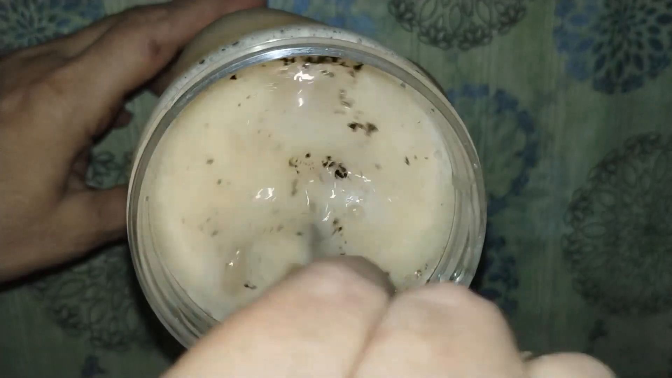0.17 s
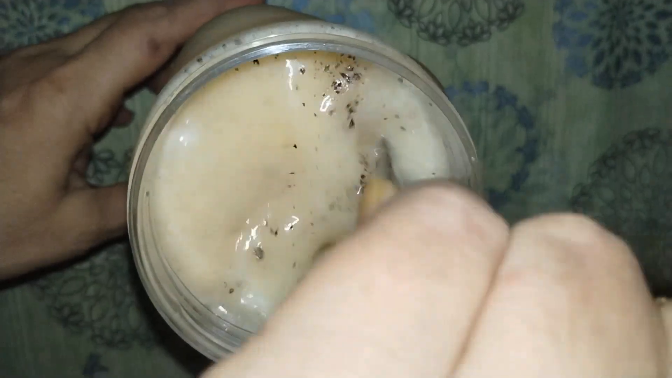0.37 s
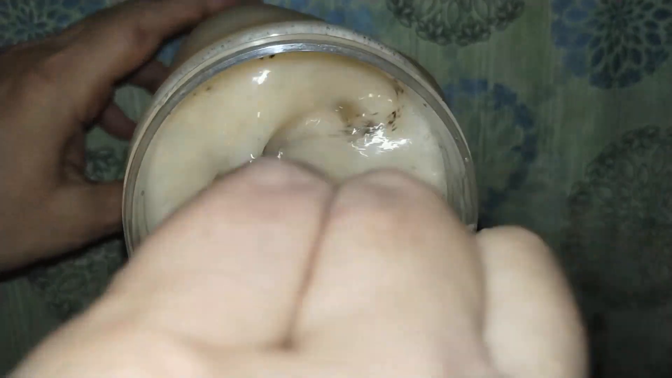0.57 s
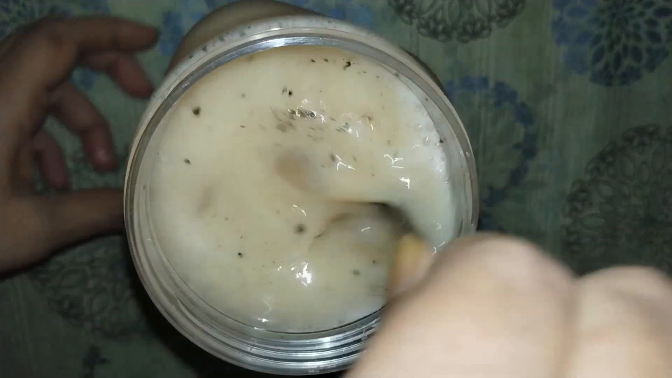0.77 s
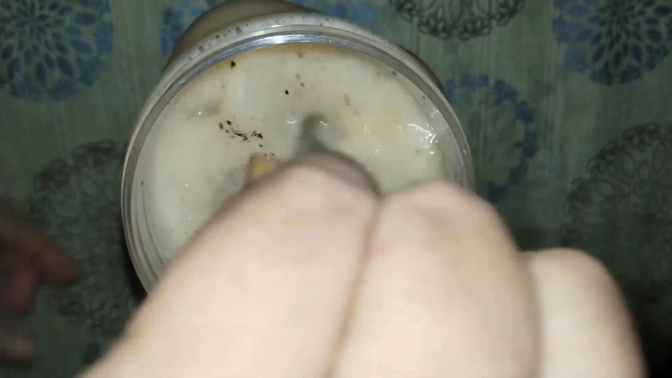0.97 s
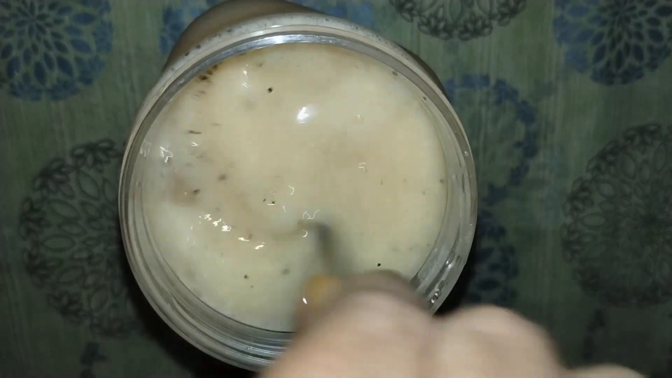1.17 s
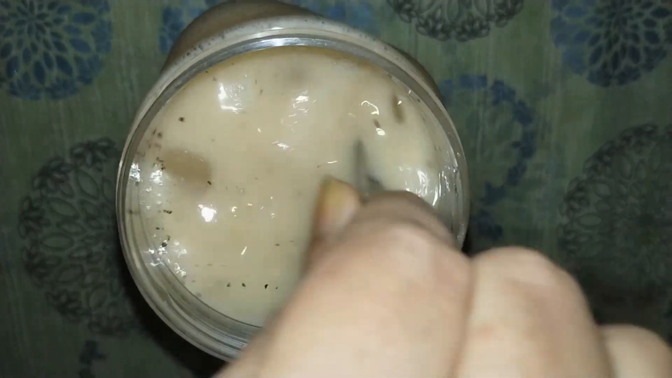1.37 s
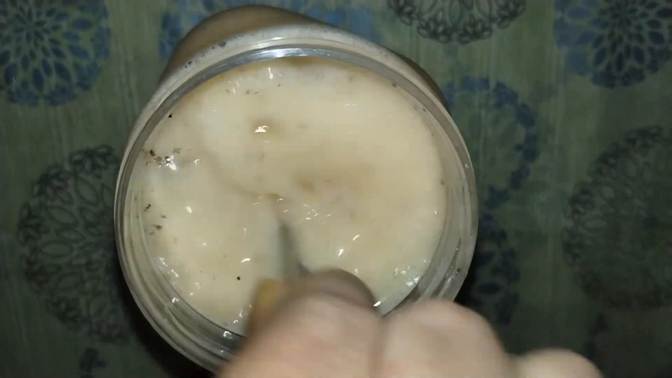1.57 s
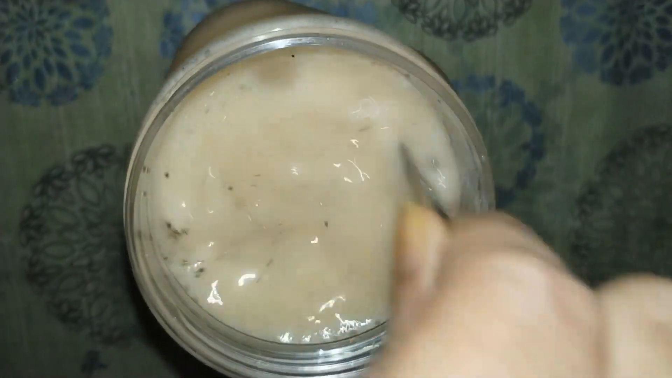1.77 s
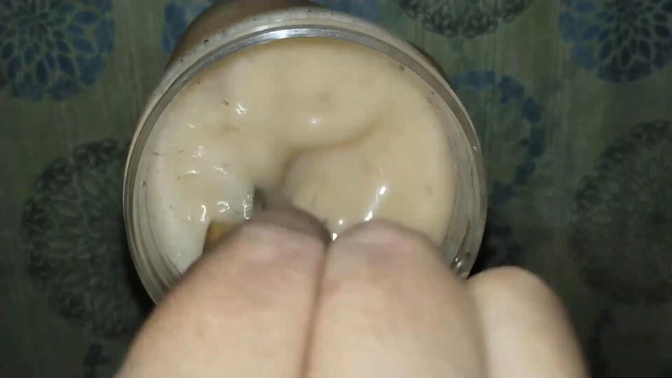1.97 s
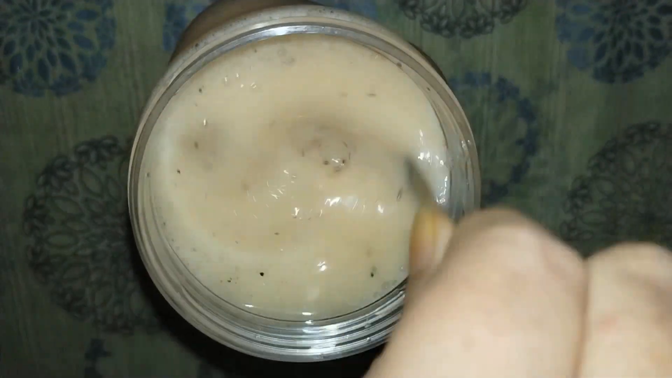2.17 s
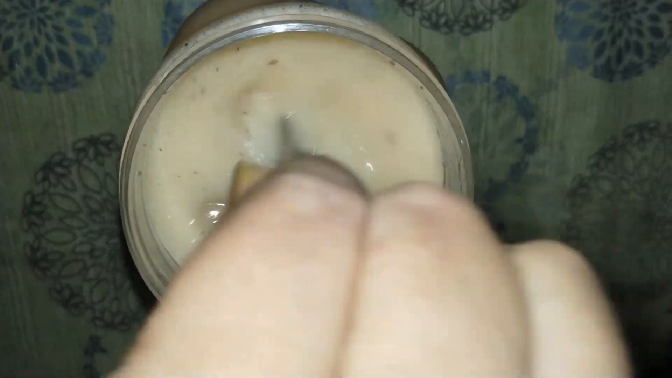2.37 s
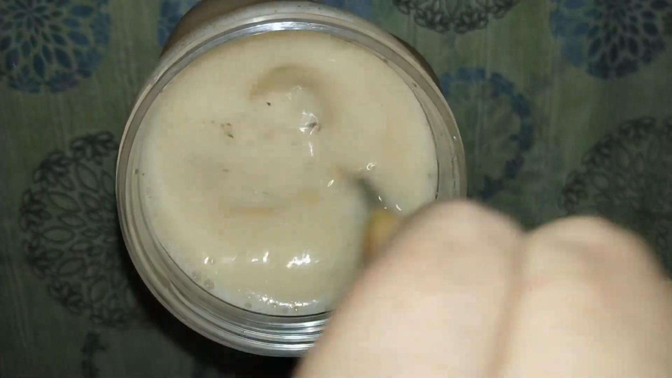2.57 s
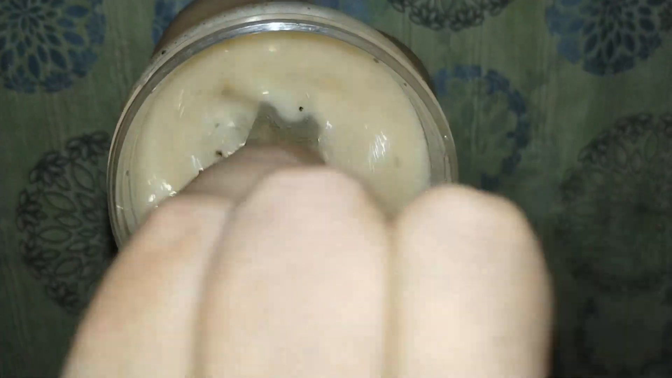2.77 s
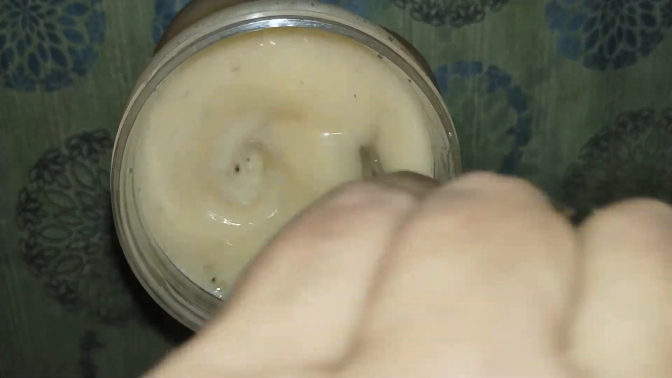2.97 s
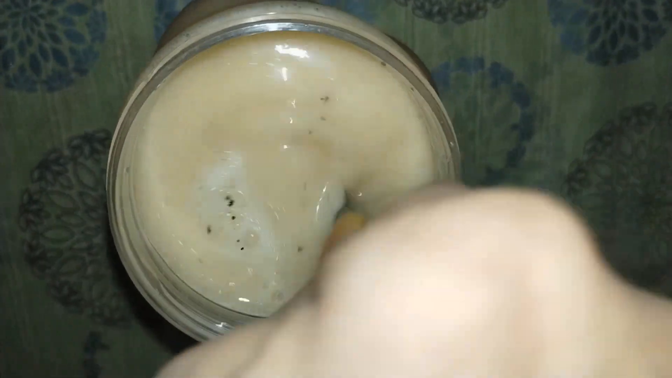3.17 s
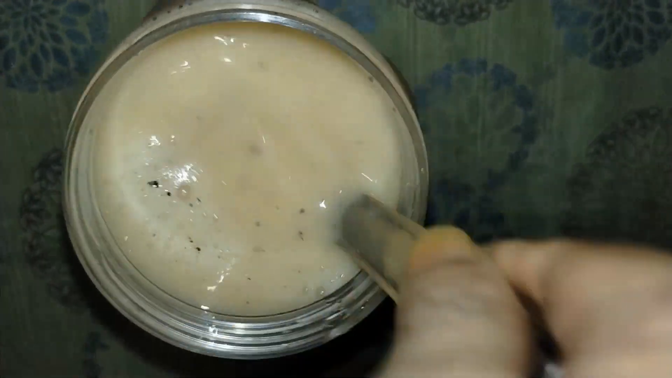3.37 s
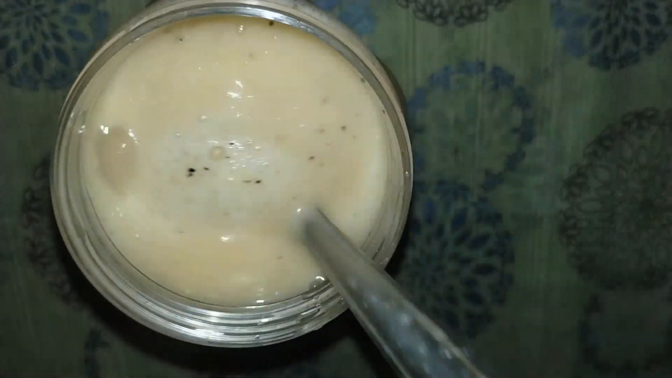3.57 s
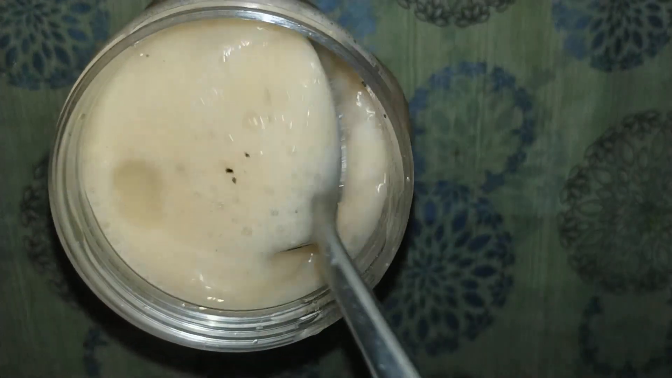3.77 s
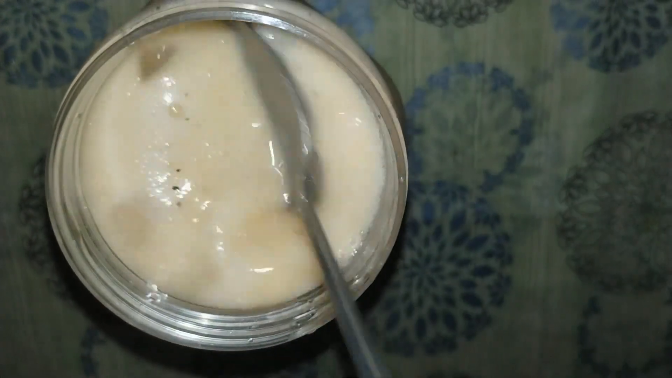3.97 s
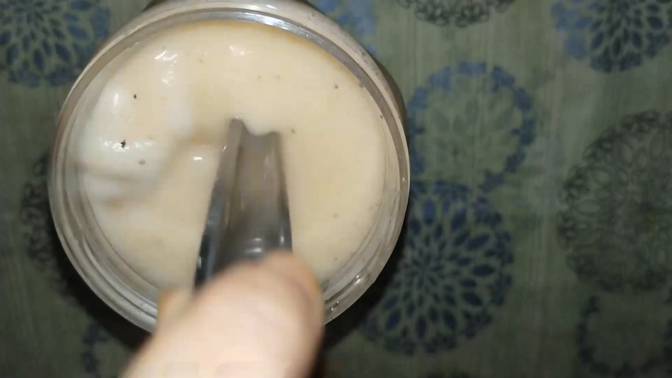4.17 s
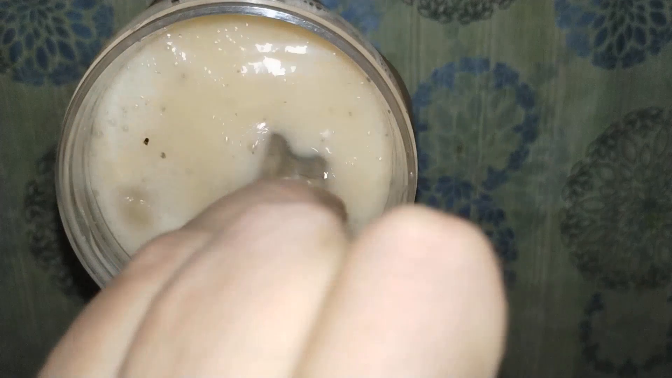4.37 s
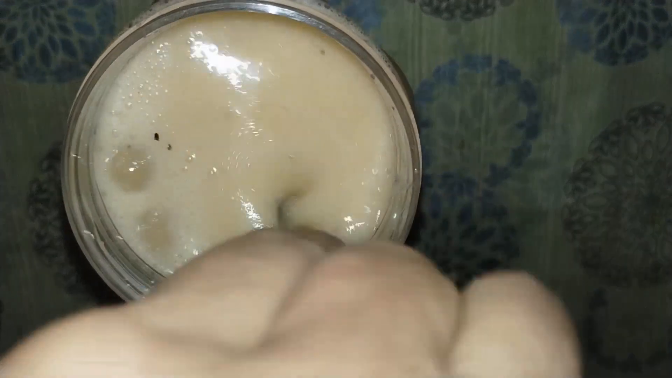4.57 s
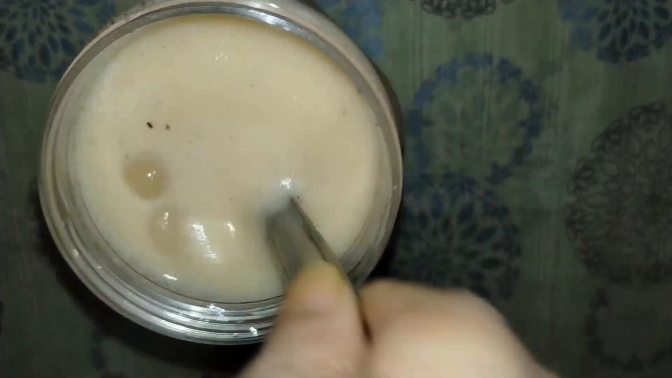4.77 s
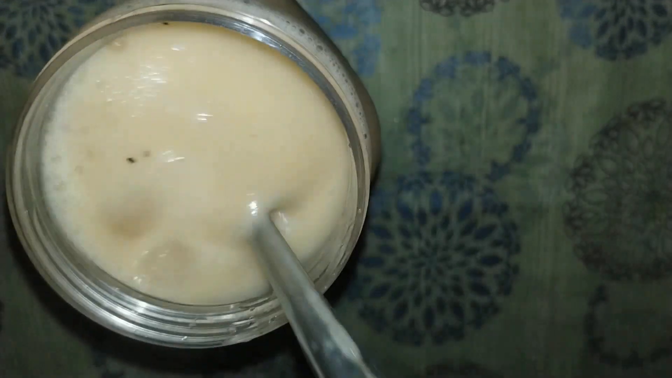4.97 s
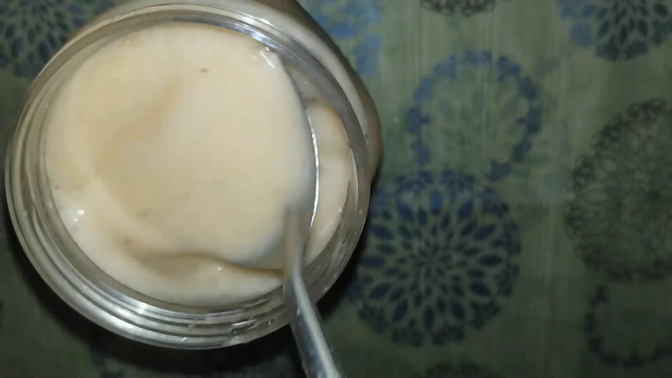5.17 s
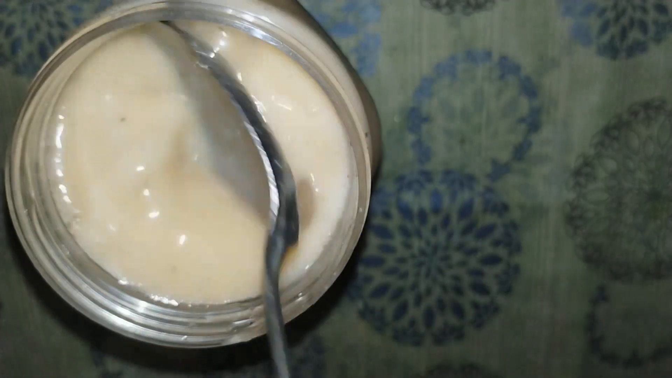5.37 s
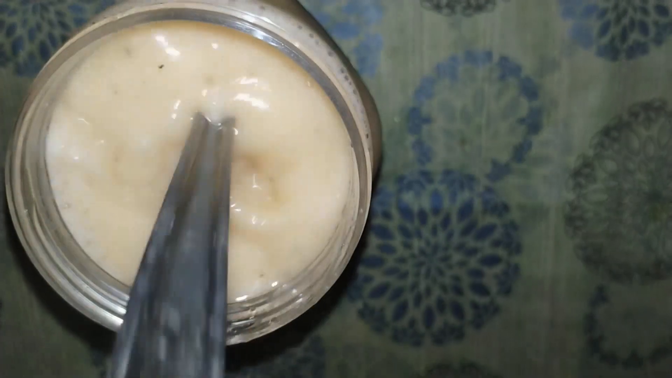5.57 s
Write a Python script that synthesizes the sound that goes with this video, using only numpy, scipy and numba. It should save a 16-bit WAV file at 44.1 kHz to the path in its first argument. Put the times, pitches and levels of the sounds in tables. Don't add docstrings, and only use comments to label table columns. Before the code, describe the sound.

A metal spoon stirs thick creamy drink in a glass jar, recorded very close in a small hard kitchen. Damped knocks and ice ticks come fast and uneven, with short scrapes and low table booms. Stirring eases after three seconds, knocks hard again around four and a half, then ends in light ticks. A fridge hums quietly throughout.

```python
import sys
import numpy as np
from scipy import signal
from scipy.fft import rfft, irfft
from scipy.io import wavfile
from scipy.ndimage import uniform_filter1d
from numba import njit

SR = 44100
rng = np.random.default_rng(int(sys.argv[2]) if len(sys.argv) > 2 else 0)


def voltage_ratio(decibels):
    exponent = np.asarray(decibels, float) / 20
    return 10 ** exponent


def output_pcm(signal):
    pcm = np.clip(np.atleast_2d(signal).T, -1, 1) * 32767
    wavfile.write(sys.argv[1], SR, np.round(pcm).astype(np.int16))


N = 247665

# start_s, level_db
FRIDGE_LEVEL = [
    (0.0, -43.5),
    (2.17, -42.5),
    (2.6, -42.5),
    (3.55, -47),
    (4.65, -48),
    (4.85, -45.5),
    (5.47, -50),
    (5.62, -46),
]
# peak_s, level_db, fade_ms_per_10db
SHUDDERS = [
    (0.02, -47, 911),
    (1.4, -45, 614),
    (2.601, -57, 402),
    (3.699, -51, 302),
    (4.82, -35.5, 163.5),
]
# freq_hz, density_db_per_hz
KITCHEN_SPECTRUM = [(20, -52.5), (37, -22), (130, 17.5), (172, -8.5), (399, -16), (1710, -53), (6720, -27),
                    (16000, -37.5)]
# peak_s, level_db, pitch_hz, fade_ms_per_10db
BOOMS = [(0.265, -32, 128, 140.5), (0.599, -33.5, 127.1, 203.5), (0.7, -29, 128.6, 45),
         (0.829, -32.5, 131, 56.5), (1.263, -30, 130.1, 50), (1.38, -38.5, 130.5, 196.5),
         (1.541, -32.5, 128.7, 19), (1.725, -28.5, 135.4, 64.5), (1.91, -40.5, 129.2, 209),
         (2.186, -25.5, 130, 46), (2.429, -38, 136.3, 50.5), (2.636, -26.5, 134.4, 77.5),
         (2.86, -47, 130.2, 145), (3.12, -36, 130.8, 68.5), (3.55, -42.5, 125.5, 299),
         (4.22, -44.5, 133.8, 61.5), (4.35, -45, 127.4, 149.5), (4.53, -35, 133.3, 31.5),
         (4.64, -38.5, 128.3, 146), (5.28, -41.5, 126.9, 245)]
# time_s, level_db
EFFORT = [(0, -45), (0.12, -52.5), (0.44, -46.5), (0.62, -45), (0.83, -49.5), (1.2, -45), (1.5, -49.5),
          (1.8, -44), (2.2, -52), (2.39, -49.5), (2.55, -50), (3.15, -46), (3.3, -49.5), (4.02, -62),
          (4.36, -44.5), (4.71, -50), (4.85, -58.5), (5.62, -58.5)]

# freq_hz, level_db, t60_s
WALL_MODES = [(566, -33, 0.4), (572, -5.5, 0.2), (665, -5.5, 0.18), (736, -41, 0.32), (744, -23, 0.51),
              (828.2, -3, 0.17), (870, -5.5, 0.068), (975, -5.5, 0.045)]
# freq_hz, level_db, t60_s
RIM_MODES = [(1150, 5, 0.019), (1250, -6, 0.051), (1444, 3, 0.023), (1661, 5, 0.043), (1905, -5, 0.054),
             (2033, -1, 0.084), (2234, -1, 0.075), (2560, -1.5, 0.024), (2740, -19, 0.11),
             (3000, -48, .025), (3440, -31.5, 0.0043), (3620, 1, 0.0089), (4000, -41, 0.03),
             (5410, -9, 0.0188)]
JAR_MODES = WALL_MODES + RIM_MODES
# freq_hz, level_db, t60_s
THUD_MODES = [(201.4, -40.5, 0.18), (261, -28, 0.073), (169.9, -29.5, 0.22), (350, -37, 0.15)]
# freq_hz, density_db_per_hz
CRACK_SPECTRUM = [(880, -31.5), (1500, 14.5), (2440, -9), (3350, -9.5), (5070, -20.5), (6500, -21),
                  (11000, -25.5), (16000, -34.5)]
# freq_hz, density_db_per_hz
RASP_SPECTRUM = [(88, -18), (150, -3), (398, -17.5), (555, -15), (837, -14), (1690, -16.5), (8730, -34),
                 (16000, -46.5)]
# freq_hz, left_minus_right_db
LEFT_GAIN = [(200, -1.5), (400, -4.5), (700, 7.5), (1300, -0.5), (2400, 2), (4400, -4), (8000, 8.5),
             (15000, 6.5)]

# start_s, peak_db, upper_mode_hz, upper_db, crack_db
FOOT_KNOCKS = [(0.091, -16, 1250, -39, -56), (0.156, -14.5, 1500, -8.5, -21), (0.484, -15.5, 1370, -8, -19),
               (1.231, -10, 2190, 5.5, -9), (1.43, -22, 3040, 16.5, -8.5), (1.489, -17.5, 1150, -4, -17.5),
               (1.927, -8.5, 1550, -38, -23), (2.289, -16.5, 1648, -7, -23), (2.603, -2.5, 1196, -9, -35),
               (2.995, -12, 1190, -6, -16), (3.019, -19, 1228, -8, -13), (3.938, -19, 1596, -4.5, -18),
               (4.601, -12, 1675, -3.5, -20)]
# start_s, peak_db, upper_mode_hz, upper_db, crack_db
LOW_KNOCKS = [
    (2.541, -10.5, 1720, 5, -26),
    (4.205, -10.5, 1870, 2.5, -12.5),
    (4.509, -4, 1306, -4.5, -13),
]
# start_s, peak_db, upper_mode_hz, upper_db, crack_db
BELLY_KNOCKS = [
    (0.723, -12.5, 1720, -4.5, -22),
    (1.032, 1.5, 1540, -4, -31.5),
    (1.171, -14.5, 1660, -3, -16),
    (1.608, -19, 1870, -16, -11),
    (2.072, -15, 1582, 1.5, -14.5),
    (4.359, -16.5, 1730, 3, -20.5),
    (4.664, -28, 1723, 2.5, -28.5),
    (5.599, -17, 2286, -7.5, -32),
]
# start_s, peak_db, upper_mode_hz, upper_db, crack_db
SHOULDER_KNOCKS = [(0.237, -18, 1560, 10, -10.5), (0.312, -5, 1110, -8, -24.5),
                   (0.563, -7.5, 1040, -3, -27), (0.648, -14.5, 1840, -16, -23),
                   (0.79, -8.5, 1500, -2.5, -19), (0.829, -11, 1080, -7, -32),
                   (1.309, -16.5, 1060, 6.5, -16.5), (1.68, -13.5, 2730, -6, -24),
                   (1.693, -7, 1444, -11, -18), (1.758, -7, 1315, -23, -12), (2.155, -9.5, 1870, -11, -15),
                   (2.334, -20, 1150, 3, -8), (2.387, -10, 1270, -2.5, -15), (2.668, -11, 1040, 3.5, -16),
                   (2.801, -9.5, 1660, -7, -23), (3.05, -17.5, 1000, 12.5, -13),
                   (3.09, -7, 1470, -4.5, -8.5), (3.127, -13.5, 1180, 1, -14.5),
                   (3.415, -13, 1033, -34, -47), (3.749, -20, 1975, 1.5, -11),
                   (4.165, -13, 3365, 11, -13.5), (5.556, -14.5, 1710, 3, -14)]
# start_s, peak_db, upper_mode_hz, upper_db, crack_db
ICE_TICKS = [(0.463, -40, 1150, 18, 0), (0.5, -25, 1790, -26, 2.5), (0.952, -24.5, 1640, -3, -7),
             (0.983, -19.5, 1780, 3, -20), (0.878, -34.5, 3000, 8, 2), (1.407, -33, 1240, 4, -14),
             (1.843, -27, 4200, 11.5, -11), (1.871, -35, 1226, -7, 1), (2.276, -71, 1619, -10, -17),
             (2.967, -35, 1202, -22, -5), (2.981, -17, 1530, -1, -20), (3.198, -26.5, 1452, 3, -10.5),
             (3.312, -29, 1335, 0.5, -2.5), (3.372, -30, 1970, 9.5, -17), (3.392, -27, 1620, 3, -24),
             (3.732, -56, 1464, 10, 6), (3.964, -23.5, 1192, -20, -45), (4.326, -19.5, 1670, -5, -54),
             (4.422, -20.5, 1220, 10.5, -6), (5.049, -38, 1520, 13.5, -45), (5.097, -19, 1520, 5, -17),
             (5.12, -29, 1630, 13, -17), (5.389, -14, 2360, 1.5, -7), (5.512, -49, 2560, -10, 15)]
# time_s, treble_db
HARDNESS = [(0.237, -2), (0.312, -33), (0.47, 6), (0.5, 6), (0.563, -5), (0.648, -15), (0.79, 0),
            (0.829, -7.5), (0.96, -1), (1.032, 5), (1.171, -1), (1.309, -5), (1.43, 0.5), (1.608, 6),
            (1.693, 9.5), (1.758, -12), (1.843, 4), (1.88, 7), (1.93, 9.5), (2.072, 6), (2.289, -1),
            (2.39, -8), (2.541, 3.5), (2.8, -2), (2.97, 3), (3.0, 1.5), (3.09, -1.5), (3.31, 6), (3.42, 5),
            (3.938, -1.5), (4.165, 7), (4.205, -7), (4.359, -13), (4.422, -8), (4.509, -5), (4.664, -4),
            (5.097, 3), (5.12, -3), (5.389, -4), (5.512, 1.5), (5.556, -5)]
# start_s, level_db, centre_hz, length_ms
SKIDS = [(0.146, -55, 8150, 22), (0.25, -45, 14000, 9.3), (0.488, -32, 8500, 21), (0.499, -30.5, 6500, 14),
         (0.829, -39, 12900, 3.9), (0.877, -34.5, 7850, 3.6), (0.968, -55, 9000, 8),
         (1.014, -29, 10400, 22), (1.165, -38, 6400, 16), (1.23, -32, 7900, 10), (1.406, -38, 6550, 5.8),
         (1.428, -19, 3080, 9.1), (1.428, -27.5, 3740, 8.7), (1.427, -29, 6100, 9.2),
         (1.604, -34, 7460, 3.5), (1.677, -37, 10500, 8), (1.829, -36, 6000, 29), (1.87, -25, 11800, 6),
         (1.871, -21, 8170, 3.4), (1.926, -34, 8600, 20), (2.139, -50, 9700, 14), (2.157, -30, 6200, 8.9),
         (2.32, -38, 9850, 37), (2.385, -45, 9790, 33), (2.539, -31, 5600, 6.1), (2.666, -40, 8100, 8.5),
         (2.9, -45, 3410, 4.6), (2.963, -41, 8800, 10.2), (3.033, -32, 4970, 3.7), (3.09, -29, 8850, 17.3),
         (3.7, -42, 1647, 13), (3.749, -27.5, 6640, 4.1), (3.938, -24, 5790, 2.9), (3.939, -35, 7560, 8),
         (4, -48, 4000, 6.8), (4.164, -23.5, 10300, 4.4), (4.18, -32, 6900, 19), (4.203, -21.5, 2830, 7),
         (4.285, -52, 8140, 10), (4.386, -44, 3000, 5.1), (4.45, -36, 2304, 5.4), (4.509, -9, 3470, 2.9),
         (4.509, -21, 9100, 9.1), (5.008, -56, 2545, 20), (5.149, -50, 2580, 8.8), (5.281, -53.5, 7400, 27),
         (5.388, -34, 3695, 7.6), (5.389, -32.5, 5620, 12), (5.41, -35, 1520, 13), (5.512, -34, 9500, 3.5),
         (0.26, -46, 2000, 8), (0.63, -49, 3000, 5.1), (1.035, -36, 1510, 14), (1.05, -28, 2500, 12),
         (1.065, -38, 2200, 8), (1.45, -34, 1290, 8.9), (1.635, -48, 1800, 8), (1.759, -26.5, 1100, 11),
         (1.762, -37, 1800, 6.9), (1.888, -38, 1490, 10), (1.945, -37, 1590, 16), (2.005, -41, 1500, 5.5),
         (2.215, -35.5, 1100, 5.4), (2.335, -44, 1150, 9), (2.35, -27, 1920, 6.7), (2.418, -32, 920, 8.3),
         (2.668, -28, 1880, 11), (2.94, -34, 2346, 10.2), (3.13, -37.5, 2180, 20), (3.425, -38, 3580, 4.9),
         (4.165, -24, 900, 6.8), (4.205, -29, 1846, 11), (4.385, -36, 1665, 7.2), (4.422, -34.5, 1150, 9.3),
         (4.665, -27, 1647, 8.9), (5.115, -39, 1125, 16), (5.565, -33, 2520, 4.4), (5.59, -38, 1488, 8.8)]
# start_s, peak_db, pitch_hz
BUMPS = [(0.2, -39.5, 322), (0.243, -33, 228), (1.444, -29, 210), (1.757, -30, 366), (2.068, -34.5, 320),
         (2.601, -30, 242), (2.8, -33, 252), (2.993, -28.5, 243), (3.086, -35, 234), (4.326, -42, 325),
         (4.518, -28.5, 240), (4.615, -31, 225), (1.036, -22, 540), (2.543, -17.5, 665), (2.606, -33, 570),
         (3.052, -30, 830), (4.216, -25, 657), (4.522, -16, 658)]
# peak_s, peak_db, fall_ms, dullness_db
STROKES = [(0.251, -35.5, 23, 2), (0.5, -33.5, 50, -2), (0.831, -14, 4.5, -7), (0.971, -33.5, 41, -6.5),
           (1.036, -31.5, 35, 5), (1.236, -30.5, 20, -17), (1.431, -24, 22, -10.5),
           (1.621, -36.5, 42, -6.5), (1.698, -30, 9.6, 3), (1.762, -25.5, 13.5, -0.5),
           (1.881, -32.5, 20, 1.5), (1.929, -25.5, 20.3, -4), (2.078, -26.5, 15, -19),
           (2.162, -30.5, 31.6, -6), (2.34, -34.5, 39.4, 3.5), (2.393, -30.5, 29.5, -17),
           (2.544, -38.5, 15.4, 8), (2.621, -26.5, 8.2, -4), (2.673, -31, 25.7, -8), (2.801, -36.5, 18, -1),
           (2.992, -21, 19.6, -11), (3.095, -16, 18, -11.5), (3.324, -45, 72, -5), (3.427, -37.5, 27, -9),
           (3.756, -57.5, 31, 14), (3.951, -39, 20, 3), (4.174, -23, 10.7, -15), (4.427, -46, 23, 6.5),
           (4.509, -13.5, 6.8, -4.5), (4.664, -31.5, 21, -7)]

FOOT_HZ, LOW_HZ, BELLY_HZ, SHOULDER_HZ, ICE_HZ = 542, 680, 665, 870, 846
WALL_TOP_HZ, HARD_SPLIT_HZ = 1000, 6600
PUSH_DELAY = 40
PORT_SIGNS = np.array([[1], [-1]])


def level(x, db):
    return x * voltage_ratio(db) / np.sqrt(np.mean(x ** 2))


def along(table, hz):
    table_hz, value = np.transpose(table)
    return np.interp(np.log(hz + 1), np.log(table_hz), value)


def curve(table):
    time_s, value = np.transpose(table)
    return np.interp(np.arange(N) / SR, time_s, value)


def colour(x, table, lo_hz=1, hi_hz=22000):
    hz = np.fft.rfftfreq(x.shape[-1], 1 / SR) + 1
    edges = 1 / np.sqrt((1 + (lo_hz / hz) ** 8) * (1 + (hz / hi_hz) ** 8))
    return irfft(rfft(x) * voltage_ratio(along(table, hz)) * edges, x.shape[-1])


def walk(rate_hz):
    hold = int(SR / rate_hz)
    steps = np.repeat(rng.standard_normal(N // hold + 1), hold)
    return 1.3 * uniform_filter1d(uniform_filter1d(steps, hold), hold)[:N]


def fine(coarse):
    return np.repeat(coarse, 32)[:N]


def swells(peak_s, db, fade_ms, rise_ms):
    late_ms = 1000 * (np.arange(0, N, 32) / SR - peak_s[:, None])
    pace_ms = np.where(late_ms < 0, rise_ms, np.maximum(fade_ms[:, None], 10))
    return voltage_ratio(db[:, None] - 10 * np.abs(late_ms) / pace_ms)


def tone(hz):
    return np.sin(2 * np.pi * np.cumsum(hz) / SR)


def train(where, rows):
    return np.bincount(where, rows.ravel(), minlength=N)[:N]


def grit(rate_hz, spread_db):
    hits = rng.random(N) < rate_hz / SR
    size_db = np.minimum(spread_db * rng.exponential(size=N), 14)
    return hits * voltage_ratio(size_db) * rng.standard_normal(N)


@njit
def ring(push, hz, t60):
    out, z = np.empty(len(push)), 0j
    fade = np.exp(-np.log(1000) / (t60 * SR))
    for i in range(len(push)):
        angle = 2 * np.pi * hz[i] / SR
        z = z * fade * complex(np.cos(angle), np.sin(angle)) + push[i]
        out[i] = z.imag
    return out


def fridge():
    hum_db = curve(FRIDGE_LEVEL)
    hum = tone(97.5 * (1 + 0.00727 * walk(5.96))) * voltage_ratio(hum_db + 0.5)
    shudder = fine(np.sum(swells(*np.transpose(SHUDDERS), 160), axis=0)) + voltage_ratio(hum_db - 12.5)
    undertone = tone(72.5 * (1 + 0.025 * walk(5.56))) * shudder * voltage_ratio(-7.0 + 1.4 * walk(7.24))
    return hum + undertone


def kitchen():
    mid, side = rng.standard_normal((2, N))
    side = colour(side, [(30, 17), (100, -31.5), (300, -30.0), (2000, -67)])
    air = colour(mid + side * PORT_SIGNS, KITCHEN_SPECTRUM)
    treble = colour(air, [(20, 0.0042), (20000, 0.0037)], 203)
    return air * voltage_ratio(-62.5 + 0.39 * walk(2.9)) / np.sqrt(np.mean(treble ** 2))


def table():
    peak_s, db, pitch_hz, fade_ms = np.transpose(BOOMS)
    each = swells(peak_s, db, fade_ms, 25.6) + 1e-12
    hz = fine(pitch_hz @ each / np.sum(each, axis=0))
    size = fine(np.max(each, axis=0)) + voltage_ratio(curve(EFFORT) - 4.5)
    boom = tone(hz * (1 + .025 * walk(14))) * size * voltage_ratio(3 + 1.0 * walk(30))
    drone_s, drone_fade_ms = 1.3, 380
    late_ms = 1000 * (np.arange(N) / SR - drone_s)
    drone_db = -47 - 10 * (late_ms / drone_fade_ms) ** 2
    boom += tone(178 * (1 + .04 * walk(6))) * voltage_ratio(drone_db + 5 * walk(12))
    return boom * voltage_ratio(.5 * PORT_SIGNS)


def slosh(rasp_db, hiss_db):
    grains = level(grit(1500, 3.5), 0)
    gaps_db = 2.8 * walk(22)
    rasp = colour(0.85 * grains + rng.standard_normal((2, N)), RASP_SPECTRUM, 100, 3440)
    hiss = colour(grains + 2.3 * rng.standard_normal((2, N)), RASP_SPECTRUM, 6030)
    return level(rasp, 0) * voltage_ratio(rasp_db + gaps_db), level(hiss, -0.7) * voltage_ratio(hiss_db + 2.2 * gaps_db)


def knocks():
    groups = ((FOOT_KNOCKS, FOOT_HZ), (LOW_KNOCKS, LOW_HZ), (BELLY_KNOCKS, BELLY_HZ),
              (SHOULDER_KNOCKS, SHOULDER_HZ), (ICE_TICKS, ICE_HZ))
    return np.transpose(sorted(row + (hz,) for rows, hz in groups for row in rows))


def chatter(age_s, count):
    luck = rng.random((count, 3, len(age_s)))
    fade_s = (0.0072 * voltage_ratio(0.45 * (luck[:, 2, 0] + 1.0)))[:, None]
    contacts = ((luck[:, 0] < .07) * 1.3 + 0.092) * (luck[:, 1] - .5) * np.exp(-age_s / fade_s)
    contacts[:, PUSH_DELAY] = 1.5
    contacts[:, :PUSH_DELAY] = 0
    return contacts / np.sqrt(np.sum(contacts ** 2, axis=1, keepdims=True))


def cushion_push(contacts, corner_hz):
    axis_hz = np.fft.rfftfreq(contacts.shape[1], 1 / SR)
    return irfft(rfft(contacts) / (1 + (axis_hz / corner_hz) ** 4))


def glass(events, where, age_s, soft, firm, rasp_db, dull):
    _, peak_db, upper_hz, upper_db, _, wall_hz = events
    place = rng.standard_normal((len(peak_db), len(JAR_MODES) + 1, 2))
    drag = level(grit(2000, 2.5), 0) * voltage_ratio(3 * walk(60))
    flutter = voltage_ratio(2.5 * walk(35))
    sway = 1 + 0.007 * walk(14)
    shiver = np.resize(flutter[::6], N) ** 2
    out = np.zeros((2, N))
    for k, (hz, db, t60) in enumerate(JAR_MODES):
        if hz < WALL_TOP_HZ:
            size_db = -13 - np.minimum(25 * np.abs(np.log2(hz / wall_hz)), 8)
            rub = voltage_ratio(db + rasp_db - 35) + voltage_ratio(db - 38.5) * dull
            push, t60_top, brush = soft, 1, flutter
        else:
            size_db = upper_db - 15.5 - np.minimum(9 * np.abs(np.log2(hz / upper_hz)), 20)
            rub = voltage_ratio(db - 32.5) * dull
            push, t60_top, brush = firm, .028, shiver
        size = voltage_ratio(db + peak_db + size_db + 2.5 * place[:, k, 0])
        turn = place[:, k, 1] * np.interp(np.log(hz), np.log([600, 1500, 4000]), [.8, 1.7, 1.7])
        mode_hz = hz * np.roll(sway, 9000 * k)
        mode_gain = np.roll(brush, 7000 * k)
        for channel, sign in enumerate((.5, -.5)):
            blows = (size * np.exp(1j * sign * turn))[:, None] * push
            force = train(where, blows.real) + 1j * train(where, blows.imag) + rub * drag
            out[channel] += ring(force, mode_hz, np.clip(t60, .004, t60_top)) * mode_gain
    note_fade = voltage_ratio(-60 * age_s * upper_hz[:, None] / 28)
    for channel, sign in enumerate((.5, -.5)):
        phase = 2 * np.pi * upper_hz[:, None] * age_s + sign * 4.9 * place[:, -1, :1]
        answer = irfft(rfft(firm) * rfft(np.sin(phase) * note_fade))
        out[channel] += train(where, voltage_ratio(peak_db + upper_db - 13.5)[:, None] * answer)
    return out, sway


def crack_noise(events, where, age_s, contacts, strokes):
    _, peak_db, _, _, crack_db, _ = events
    puff_size = voltage_ratio(peak_db + crack_db + 9.5)[:, None]
    puffs = train(where, puff_size * np.abs(contacts) * np.exp(-age_s / 0.0059))
    puffs = signal.lfilter([1], [1, -np.exp(-1 / (0.00051 * SR))], puffs)
    splinters = level(grit(6000, 2.5), 0) * voltage_ratio(3.5 * walk(70))
    shared = puffs * rng.standard_normal(N) + splinters * strokes * voltage_ratio(-6.5)
    apart = shared * rng.standard_normal((2, N))
    crack = colour(shared, CRACK_SPECTRUM, 5100) + 0.9 * colour(apart, CRACK_SPECTRUM, 3550)
    return crack + 1.1 * colour(apart, CRACK_SPECTRUM, 2076, 6600)


def steel(x, t60):
    t = np.arange(1024) / SR
    tail = rfft(rng.standard_normal(len(t)) * voltage_ratio(-60 * t / t60))
    tail = irfft(tail / np.sqrt(uniform_filter1d(np.abs(tail) ** 2, size=13)))
    return signal.fftconvolve(x, tail[None] / np.sqrt(np.sum(tail ** 2)), axes=1)[:, :N]


def cushioned(x):
    top = colour(x, [(20, 0), (20000, 0)], HARD_SPLIT_HZ)
    return x + top * (voltage_ratio(curve(HARDNESS)) - 1)


def patchy(x, depth_db, rate_hz):
    spectrum, octave = rfft(x), np.log2(np.fft.rfftfreq(N, 1 / SR) + 1)
    out = 0
    for mid in np.arange(10.75, 14.2, .25):
        band = np.clip(1 - 4 * np.abs(octave - mid), 0, 1)
        out = out + irfft(spectrum * band, N) * voltage_ratio(depth_db * walk(rate_hz))
    return out


def thud(peak_db, where, soft, sway):
    blows = train(where, voltage_ratio(0.58 * peak_db - 5.5)[:, None] * soft)
    force = blows * np.exp(.4j * PORT_SIGNS)
    out = np.zeros((2, N))
    for hz, db, t60 in THUD_MODES:
        out += voltage_ratio(db) * np.array([ring(f, hz * sway, max(t60, .004)) for f in force])
    return out


def stroke_envelopes():
    peak_s, peak_db, fall_ms, dull_db = (c[:, None] for c in np.transpose(STROKES))
    late_ms = 1000 * (np.arange(0, N, 32) / SR - peak_s)
    rise_share = np.where(late_ms < 0, 0.75, 1)
    bells = voltage_ratio(peak_db) * np.exp(-(late_ms / rise_share / np.maximum(fall_ms, 3)) ** 2)
    return [fine(np.sum(b, axis=0)) for b in (bells, bells * voltage_ratio(dull_db))]


def jar():
    events = knocks()
    start_s, peak_db, upper_hz = events[:3]
    age_s = np.arange(2048) / SR
    contacts = chatter(age_s, len(start_s))
    soft = cushion_push(contacts, 1500)
    firm = cushion_push(contacts, 2 * upper_hz[:, None])
    first = np.round(start_s * SR).astype(int)[:, None] - PUSH_DELAY
    where = np.maximum(first + np.arange(len(age_s)), 0).ravel()
    rasp_db = curve(EFFORT)
    strokes, dull = stroke_envelopes()
    out, sway = glass(events, where, age_s, soft, firm, rasp_db, dull)
    crack = crack_noise(events, where, age_s, contacts, strokes)
    linger = 0.074 * SR
    swirl = signal.lfilter([1 / linger], [1, -np.exp(-1 / linger)], strokes)
    hiss_db = 20 * np.log10(voltage_ratio(-62.5 + 0.85 * (rasp_db + 48.5)) + voltage_ratio(-29.5) * swirl)
    rasp, hiss = slosh(rasp_db, hiss_db)
    treble = patchy(cushioned(steel(crack, .03)) * voltage_ratio(11) + hiss, 3.5, 30)
    out = signal.sosfilt(signal.butter(6, 505, "highpass", fs=SR, output="sos"), out)
    out[1] = np.roll(out[1], 7)
    return out + thud(peak_db, where, soft, sway) + treble + rasp


def room(x):
    t = np.arange(int(.6 * SR)) / SR
    low, high = rng.standard_normal((2, 2, len(t)))
    low_t60_s, high_t60_s = 0.24, 0.15
    low = colour(low, [(20, 0.0072), (20000, 0.0075)], 0.79, 1535) * voltage_ratio(-60 * t / low_t60_s)
    high = colour(high, [(20, 0.00059), (20000, 0.0038)], 1400, 10400) * voltage_ratio(-60 * t / high_t60_s)
    tail = (low + high) * np.clip((t - .004) / 0.012, 0, 1)
    tail = tail * voltage_ratio(-11.5) / np.sqrt(np.sum(tail ** 2, axis=1, keepdims=True))
    return signal.fftconvolve(x[None], tail, axes=1)[:, :N]


def skids():
    start_s, db, hz, length_ms = (c[:, None] for c in np.transpose(SKIDS))
    age_ms = 1000 * np.arange(4096) / SR
    luck = rng.standard_normal((len(start_s), 4, len(age_ms)))
    length_ms = np.maximum(length_ms, 2)
    shape = (1 - np.exp(-age_ms / (0.18 * length_ms))) * np.exp(-age_ms / length_ms)
    grains = luck[:, 0] * luck[:, 1] ** 2
    width_octaves = 0.33
    axis_hz = np.fft.rfftfreq(len(age_ms), 1 / SR) + 1
    band = np.exp(-(np.log2(axis_hz / hz) / width_octaves) ** 2)
    band = band * uniform_filter1d(luck[:, 1, :band.shape[1]], size=11, axis=1)
    where = (np.round(start_s * SR).astype(int) + np.arange(len(age_ms))).ravel()
    out = []
    for channel, sign in enumerate((.5, -.5)):
        rows = irfft(rfft(grains + 0.74 * 2.3 * luck[:, 2 + channel]) * band)
        gain = voltage_ratio(db - 1.5 + sign * along(LEFT_GAIN, hz))
        rows = rows / np.std(rows, axis=1, keepdims=True) * shape * gain
        out.append(train(where, rows))
    return np.array(out)


def bumps():
    start_s, db, hz = (c[:, None] for c in np.transpose(BUMPS))
    t60_s, rise_ms, sag_per_s = 0.12, 7.8, 0.74
    age_s = np.arange(8192) / SR
    shape = voltage_ratio(db - 60 * age_s / t60_s) * (1 - np.exp(-1000 * age_s / rise_ms))
    phase = 2 * np.pi * hz * age_s * (1 - sag_per_s * age_s)
    where = (np.round(start_s * SR).astype(int) + np.arange(len(age_s))).ravel()
    turn = rng.random((len(start_s), 1))
    return np.array([train(where, shape * np.sin(phase + sign * turn)) for sign in (.7, -.7)])


def scene():
    left, right = jar()
    wet = room((left + right) / 2)
    left = colour(left, [(hz, db / 2) for hz, db in LEFT_GAIN])
    right = colour(right, [(hz, -db / 2) for hz, db in LEFT_GAIN])
    near = np.array([left, right]) + table() + fridge() + kitchen() + skids() + bumps()
    return near + wet * (.4 + .9 * np.array([walk(280), walk(280)]))


def roll_off(x):
    return signal.sosfilt(signal.butter(12, 16820, fs=SR, output="sos"), x)


def record(dry):
    top = signal.ellip(8, .2, 60, 16000, fs=SR, output="sos")
    limited = dry / (1 + (dry / .92) ** 6) ** (1 / 6)
    return roll_off(signal.sosfilt(top, limited))


dry = scene()
out = record(dry)
output_pcm(out)
```